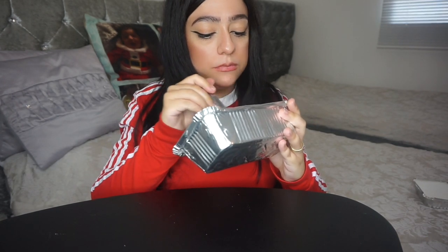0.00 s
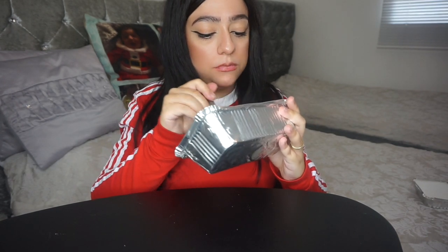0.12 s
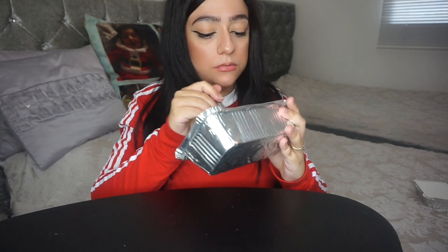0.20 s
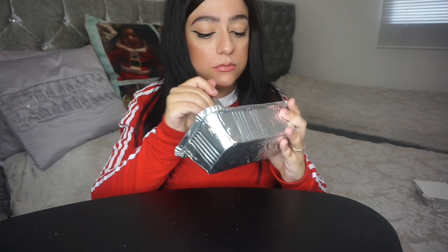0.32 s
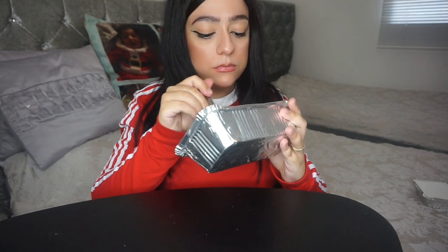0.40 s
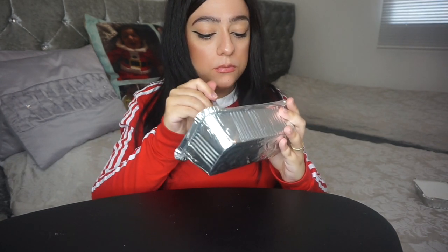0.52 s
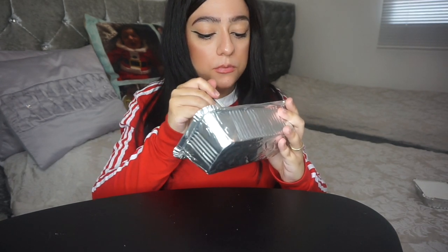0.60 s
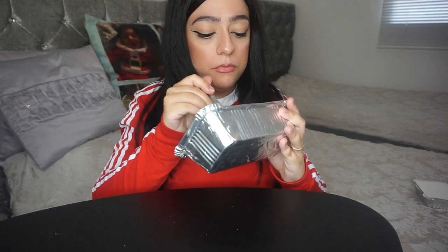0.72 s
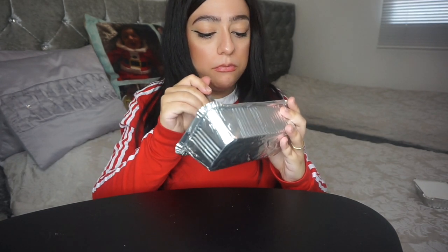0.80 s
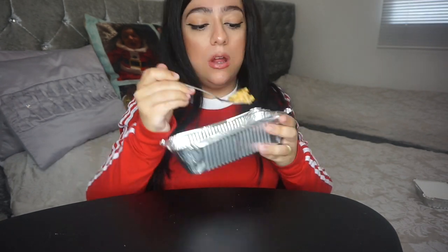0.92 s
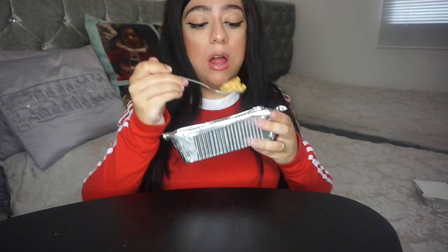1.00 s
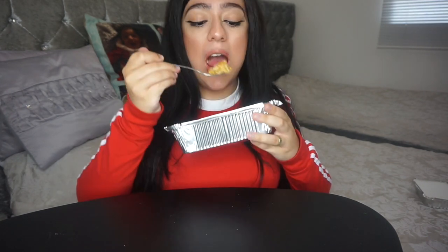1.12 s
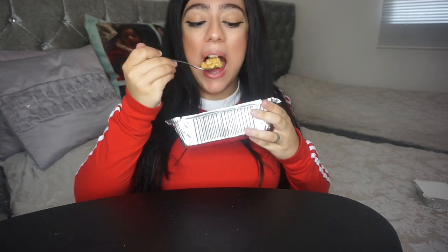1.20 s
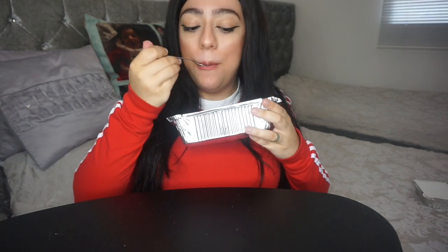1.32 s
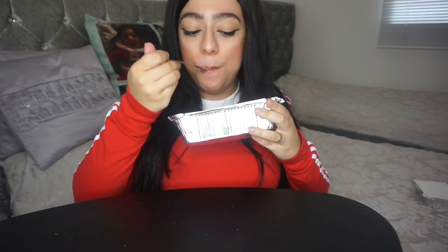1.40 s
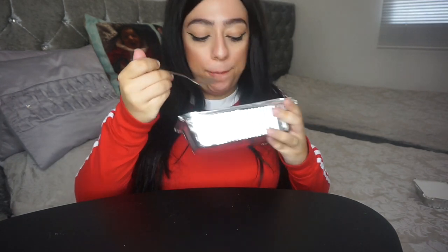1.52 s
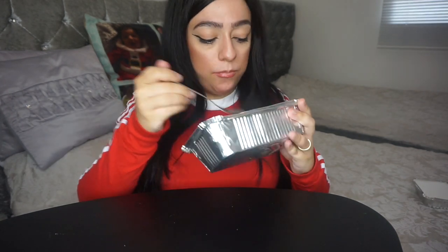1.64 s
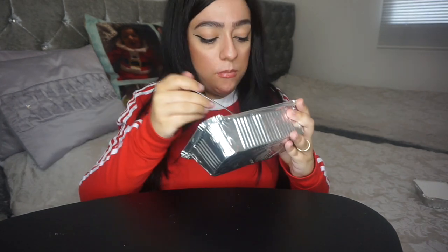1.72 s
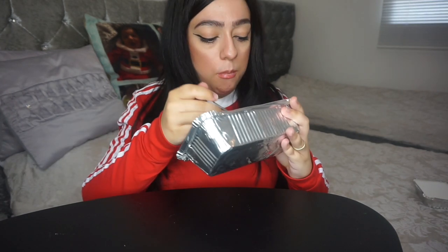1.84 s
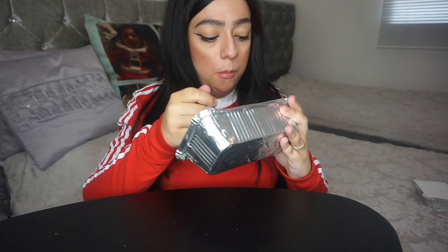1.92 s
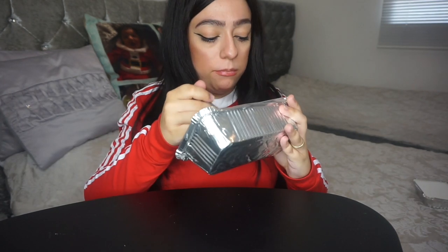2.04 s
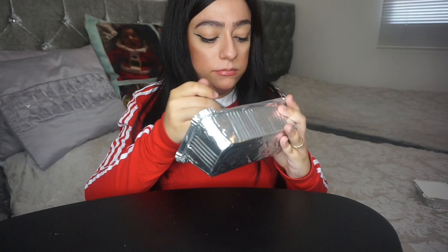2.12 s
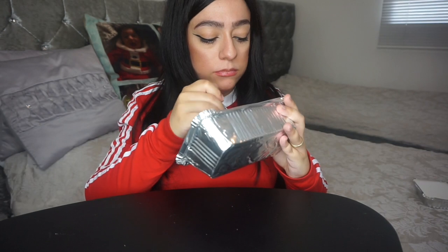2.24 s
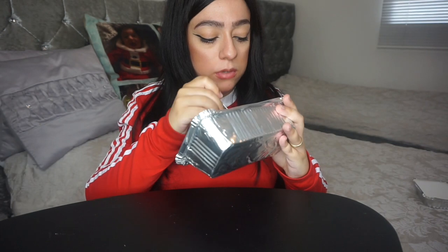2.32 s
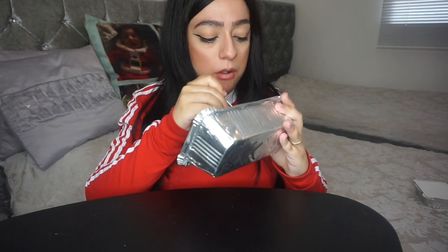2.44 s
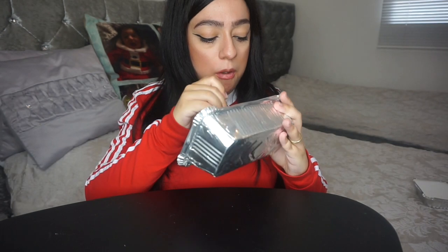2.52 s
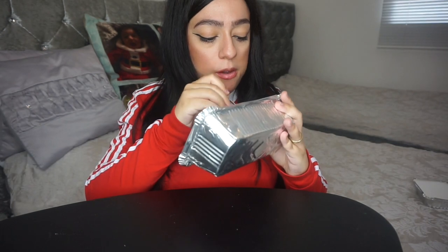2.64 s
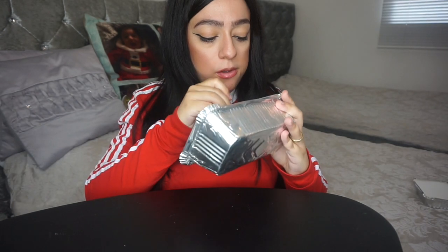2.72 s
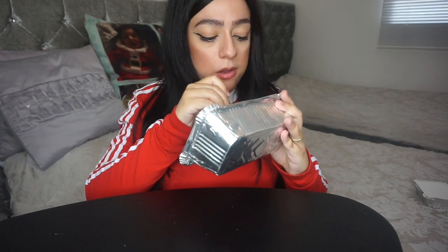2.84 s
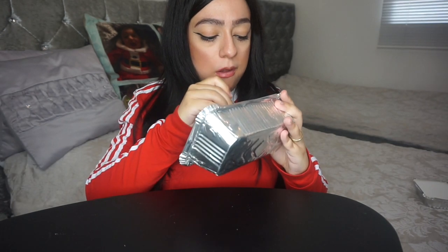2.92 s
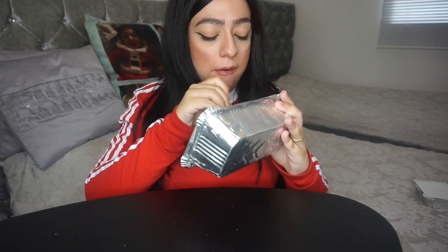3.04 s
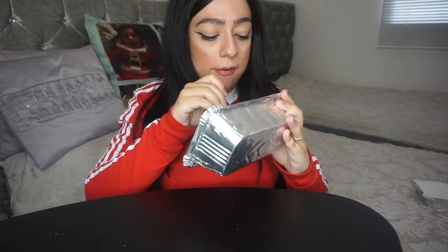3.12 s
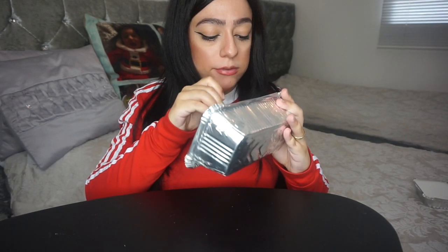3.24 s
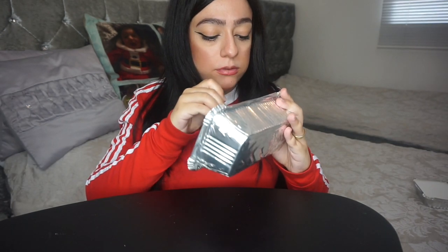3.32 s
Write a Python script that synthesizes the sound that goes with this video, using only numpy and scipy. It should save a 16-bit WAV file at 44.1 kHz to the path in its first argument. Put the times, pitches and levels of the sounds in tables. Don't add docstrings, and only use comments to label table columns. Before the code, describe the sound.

A fork scrapes and clacks inside a hand-held foil tray, a loud rattling burst around half a second, then sparser, softer scrapes with pauses, recorded close in stereo in a quiet furnished bedroom.

```python
import sys
import numpy as np
from scipy import signal
from scipy.fft import rfft, irfft
from scipy.io import wavfile
from scipy.ndimage import uniform_filter1d

SR = 44100
rng = np.random.default_rng(int(sys.argv[2]) if len(sys.argv) > 2 else 0)


def pcm_store(signal):
    levels = np.round(np.clip(np.atleast_2d(signal), -1, 1) * 32767)
    wavfile.write(sys.argv[1], SR, levels.astype(np.int16).T)


def volts_from_decibels(level):
    exponent = np.asarray(level, float) / 20
    return 10 ** exponent


N = 147735
LEAD = 6000
SIZE = N + LEAD

# frequency in Hz, density in dB per Hz.
FLOOR_SPECTRUM = [(25, -18), (120, -11), (350, -6.5), (600, -9), (1900, -15), (4500, -26), (9000, -30),
                  (16000, -28.5)]
# frequency in Hz, likeness from 0 to 1.
FLOOR_LIKENESS = [(50, 1), (250, 0.49), (1000, 0.17), (4000, 0.057), (12000, 0.6)]
FLOOR_DB, WHINE_HZ, WHINE_DB = -53, 15300, -72

# frequency in Hz, time to fall 60 dB in seconds.
ROOM_T60 = [(150, 0.58), (1000, 0.49), (4000, 0.53), (8000, 0.65), (14000, 0.33)]
ROOM_DB, ROOM_DELAY_S, ROOM_LIKENESS = -10, 0.0081, 0.55

# start in seconds, peak in dB, pitch in Hz, 60 dB decay in seconds.
TICKS = [(0.051, -33.5, 10200, 0.0063), (0.26, -15.5, 11200, 0.0078), (0.538, -14, 11600, 0.008),
         (1.182, -36, 11250, 0.019), (1.005, -48, 11900, .01), (1.308, -46, 13800, .012),
         (1.5075, -36.5, 11630, 0.0089), (1.5074, -33, 14900, 0.012), (1.5077, -44, 7650, 0.009),
         (2.03, -31, 11000, .02), (1.9966, -31, 10400, 0.026), (2.009, -26, 12800, 0.022),
         (2.4425, -44.5, 10200, 0.023), (2.654, -42, 9970, 0.018), (2.9195, -41.5, 11200, 0.02),
         (3.161, -41, 11100, 0.02), (3.241, -44, 9270, 0.015), (3.255, -44.5, 9800, 0.041),
         (3.2826, -41, 12800, 0.016), (3.2925, -35, 11300, 0.012), (3.323, -41.5, 10000, 0.027)]
TICK_WIDTH_HZ = 1900

# start in seconds, frequency in Hz, level in dB, 60 dB decay in seconds.
PANEL_RINGS = [(.1962, 386, -22, .05), (.341, 1404, -37, .45), (1.101, 1512, -33, .16),
               (1.984, 224, -34, .5), (2.585, 1150, -41, .35), (3.046, 1185, -35, .3),
               (3.225, 700, -50.5, .6), (.592, 226, -31.5, .33), (.3195, 3390, -23, .024),
               (3.037, 3690, -27, .06), (.64, 522, -27, .3), (.545, 1400, -27, .12)]
PANEL_HELD_S, PANEL_GRIP_DB_PER_S = 0.085, 500

# start in seconds, peak in dB, struck region in Hz, treble in dB.
RIB_KNOCKS = [(0.1965, -12.5, 1804, -23), (0.2618, -13.5, 3570, 14), (0.2614, -15.5, 2260, -10),
              (0.3183, -8, 1940, -10), (0.3196, -9, 2980, -25), (0.3275, -28, 3150, -25),
              (0.539, -13.5, 3610, -10), (0.6112, -9.5, 3130, -12), (0.6223, -6, 3110, -19),
              (0.6376, -4, 3160, -25), (0.649, -2, 2590, -23), (0.6776, -15.5, 3080, -22),
              (0.8317, -29, 1830, -22), (1.0043, -39, 2050, -22), (1.005, -50, 3280, -3),
              (1.0545, -24, 2860, -13), (1.08, -15.5, 2670, -10), (1.574, -42.5, 1850, -22),
              (1.578, -44, 3900, -21), (1.9807, -20, 1860, -10), (2.0307, -23, 3720, -5),
              (2.2532, -23, 2730, -12), (2.2885, -17.5, 2315, -21), (2.2882, -20, 3450, -24),
              (2.311, -16, 3240, -17), (2.3214, -18.5, 2370, 8), (2.3205, -16, 3350, -6),
              (2.334, -21, 2410, -10), (2.5301, -11, 3150, -30), (2.541, -20, 3180, -20),
              (2.5691, -13.5, 3270, -26), (2.7636, -38, 3260, -17), (2.796, -27, 2900, -15),
              (2.8139, -20, 2400, 3), (2.812, -18, 3980, -15), (2.8238, -17.5, 2600, -9),
              (2.847, -22, 2670, -15), (2.854, -28, 2650, -8), (3.0351, -17.5, 3720, -20)]
PING_DB, PING_T60_S, PING_RISE_S = -5, 0.022, 0.0008
PING_DETUNE = 0.07
RIB_BODY_DB = -4

# start in seconds, length in seconds, level in dB, swell over the stroke in dB.
STROKES = [(-.09, 0.071, -34.5, 1), (0.194, 0.05, -35, -7), (0.243, 0.048, -39.5, 5.5),
           (0.316, 0.047, -30, -17.5), (0.537, 0.11, -23, 4), (0.627, 0.047, -27.5, 13),
           (0.668, 0.038, -34, 3.5), (1.043, 0.029, -29, 8.5), (1.077, 0.052, -33.5, -5.5),
           (1.978, 0.076, -34, -0.5), (2.25, 0.045, -38, 1.5), (2.306, 0.058, -36, -2.5),
           (2.536, 0.063, -32.5, -3), (2.799, 0.05, -39.5, -9.5), (2.822, 0.04, -32.5, -2.5),
           (3.031, 0.032, -28.5, -3.5), (3.07, 0.03, -33, -6.5), (3.344, 0.044, -39.5, 15.5)]
# base in dB, belly in dB, wall in dB, lip in dB, treble in dB.
STROKE_COLOUR = [(-1, -1, 1.5, 8.5, 6), (-2.5, -1, -1, -0.5, -3), (-7, -11, 4, 13.5, 10),
                 (1, 1.5, -2.5, -15, -11), (-6.5, -4.5, -3, -1, -1), (-4.5, -4.5, -3.5, -3.5, -11.5),
                 (-1, -5.5, -4, -1.5, -1.5), (-16, 6, -3, 1, -3), (-8, 3.5, -1.5, 8, 2),
                 (-5, 0, -3.5, 0.5, -2), (-3, 1.5, 2.5, -5, -3), (-3.5, 0, -2, 4, -2.5),
                 (2, 4, 1.5, 4.5, -1), (2, 7, 0.5, 1, -1.5), (-6.5, -2.5, 0.5, -1.5, -5),
                 (-23, -0.5, -3, -1, -1.5), (-3.5, -1.5, -1, 3, -3.5), (22, 3, 22, 15, 16.5)]
ATTACK_S, RELEASE_DB_PER_S = 0.0052, 460
SLIPS_PER_S, SLIP_SPREAD_DB = 3000, 2.5

# start in seconds, peak in dB, struck region in Hz, treble in dB.
KNOCKS = [(0.196, -12.5, 420, -38), (0.327, -12.5, 1120, -30), (0.538, -8.5, 1380, 6),
          (0.8935, -35, 1225, -23), (1.0045, -29, 610, -13), (1.062, -27, 610, -20), (1.081, -21, 800, -23),
          (1.98, -18.5, 810, -31), (2.255, -20.5, 960, -5), (2.319, -16.5, 606, -3), (2.334, -17, 1100, 1),
          (2.543, -20, 740, -21), (2.574, -16, 670, -15), (2.587, -31, 700, -8), (2.797, -23, 515, 3),
          (2.8123, -20.5, 570, 0.5), (2.8244, -13, 1025, 1), (3.032, -12, 533, -22), (3.04, -5, 1130, -21),
          (3.343, -26, 840, -11), (0.654, -9, 860, -20), (0.682, -14, 955, -20)]
KNOCK_DB, KNOCK_TREBLE_DB, CONTACT_S = -23.5, 2, 0.0012
FOCUS_DB, FOCUS_OCTAVES = 14, 0.2

# frequency in Hz, level in dB, 60 dB decay in seconds.
TRAY_MODES = [(223, -4, 0.062), (318.7, 0, 0.067), (393.6, -2, 0.094), (524, -1.5, 0.05), (774, -9, 0.033),
              (872, -6, 0.089), (1054, -3.5, 0.13), (1134, -1, 0.09), (1865, -5, 0.08), (2370, -1, 0.03),
              (2530, -13, .032), (2920, -32, .035), (3312, -34, 0.033), (4470, -32, 0.025)]
TRAY_DB = -5
# frequency in Hz, density in dB per Hz.
FOIL_SPECTRUM = [(150, -30), (230, -11), (1100, -3), (1600, -10.5), (3400, -11.5), (4300, -20), (7500, -28),
                 (13500, -23), (16000, -30)]
# frequency in Hz, 60 dB decay in seconds.
FOIL_T60 = [(200, 0.062), (1000, 0.036), (3000, 0.013), (5000, 0.0044), (7000, 0.0018)]
FOIL_MODES = 110

BASE_BELOW_HZ, BELLY_BELOW_HZ, WALL_FROM_HZ, LIP_FROM_HZ, TREBLE_FROM_HZ = 430, 950, 1650, 3800, 6000
MODE_SCATTER_DB, MODE_PAN_DB = 2.5, 3.5
PAN_DB = -2
FULL_PAN_HZ, RIM_FROM_HZ, TRAY_CUT_HZ = 2500, 3400, 140
TOP, CUTOFF_HZ = 0.7, 16600


def at_hz(points, hz):
    points = np.array(points)
    return np.interp(np.log(hz), np.log(points[:, 0]), points[:, 1])


def two_mics(mid, side, alike):
    return np.sqrt(1 + alike) * mid + np.sqrt(1 - alike) * side * [[1], [-1]]


def floor():
    hz = np.maximum(np.arange(N // 2 + 1) * SR / N, 1)
    mid, side = rfft(rng.standard_normal((2, N))) * volts_from_decibels(at_hz(FLOOR_SPECTRUM, hz))
    hiss = irfft(two_mics(mid, side, np.clip(at_hz(FLOOR_LIKENESS, hz), -1, 1)), N)
    whine = volts_from_decibels(WHINE_DB) * np.sin(2 * np.pi * WHINE_HZ * np.arange(N) / SR)
    return volts_from_decibels(FLOOR_DB) * hiss / hiss.std() + whine


def room(near):
    t = np.arange(SR // 2 + SR // 4) / SR
    white = rng.standard_normal((2, 2, len(t)))
    tails = 0
    for k, hz in enumerate(125 * 2. ** np.arange(8)):
        edges = [hz / np.sqrt(2), min(hz * np.sqrt(2), 19000)]
        octave = signal.butter(2, edges, "band", fs=SR, output="sos")
        tails = tails + signal.sosfilt(octave, white[k % 2]) * volts_from_decibels(-60 * t / at_hz(ROOM_T60, hz))
    build_up = np.clip(t / ROOM_DELAY_S - 1, 0, 1)
    tails = tails * build_up / np.sqrt(SR * 0.032)
    mid, side = signal.fftconvolve(tails, near.mean(axis=0)[None], axes=1)[:, :near.shape[1]]
    return two_mics(mid, side, ROOM_LIKENESS) / np.sqrt(2)


def ticks():
    t = np.arange(2000) / SR
    out = np.zeros((2, SIZE + len(t)))
    grains = rng.standard_normal((len(TICKS), 3, len(t)))
    for (start, db, hz, t60), grain in zip(TICKS, grains):
        shared_and_own = grain[0] + 0.57 * grain[1:]
        burst = shared_and_own * volts_from_decibels(-60 * t / t60) * np.minimum(t / 0.001, 1)
        edges = np.clip([hz - TICK_WIDTH_HZ, hz + TICK_WIDTH_HZ], 1000, 17000)
        burst = signal.sosfilt(signal.butter(3, edges, "band", fs=SR, output="sos"), burst)
        i = int(start * SR) + LEAD
        out[:, i:i + len(t)] += volts_from_decibels(db) * burst / np.abs(burst).max()
    return out[:, :SIZE]


def panels():
    out = np.zeros(SIZE)
    for start, hz, db, t60 in PANEL_RINGS:
        t = np.maximum((np.arange(SIZE) - LEAD) / SR - start, 0)
        flutter = uniform_filter1d(rng.standard_normal(SIZE), size=600)
        flutter_db = 3.53 * flutter / flutter.std()
        grip_db = PANEL_GRIP_DB_PER_S * np.maximum(t - PANEL_HELD_S, 0) * (hz < BASE_BELOW_HZ)
        swell = np.minimum(t * hz / 3, 1)
        out += volts_from_decibels(db - 60 * t / t60 - grip_db + flutter_db) * swell * np.sin(2 * np.pi * hz * t)
    return out * volts_from_decibels([[PAN_DB / 2], [-PAN_DB / 2]])


def rib_pings():
    t = np.arange(2000) / SR
    out = np.zeros((2, SIZE + len(t)))
    luck = rng.uniform(-1.2, 1, (len(RIB_KNOCKS), 3))
    fade = volts_from_decibels(-60 * t / PING_T60_S) * np.minimum(t / PING_RISE_S, 1)
    for (start, db, hz, _), (below, above, pan) in zip(RIB_KNOCKS, luck):
        tones_hz = hz * (1 + PING_DETUNE * np.array([[0], [-1 + 0.29 * below], [1 + 0.44 * above]]))
        tones = np.sin(2 * np.pi * tones_hz * t) * [[0.7], [0.35], [0.35]]
        ping = volts_from_decibels(db + PING_DB) * fade * tones.sum(axis=0)
        i = int(start * SR) + LEAD
        out[0, i:i + len(t)] += ping * volts_from_decibels(PAN_DB / 2 + pan)
        out[1, i + 1:i + len(t)] += ping[:-1] * volts_from_decibels(-PAN_DB / 2 - pan)
    return out[:, :SIZE]


def stroke_shapes():
    t = (np.arange(SIZE) - LEAD) / SR
    start, length, db, swell_db = np.transpose(STROKES)[:, :, None]
    since = t - start
    swell = swell_db * (np.clip(since / length, 0, 1) - 0.5)
    release = RELEASE_DB_PER_S * np.clip(since - length, 0, 0.3)
    attack = np.clip(since / ATTACK_S, 0, 1)
    return volts_from_decibels(db + swell - release) * attack * (since < length + 0.15)


def slip_clicks():
    happens = rng.random((4, SIZE)) < SLIPS_PER_S / SR
    sign = rng.choice([-1, 1], (4, SIZE))
    strength = volts_from_decibels(SLIP_SPREAD_DB * np.minimum(rng.exponential(1, (4, SIZE)), 4))
    slips = happens * sign * strength
    return slips / slips.std()


def tray_modes():
    small_hz = np.geomspace(150, 15800, num=FOIL_MODES) * rng.uniform(0.97, 1.01, FOIL_MODES)
    small_t60 = at_hz(FOIL_T60, small_hz)
    small_db = at_hz(FOIL_SPECTRUM, small_hz) + 10 * np.log10(small_hz / 1000 * 0.042 / small_t60)
    strong = [(hz, db + TRAY_DB, t60) for hz, db, t60 in TRAY_MODES]
    return strong + list(zip(small_hz, small_db, small_t60))


def mode_pressure(hz, db, high):
    parts = [hz < BASE_BELOW_HZ,
             (hz >= BASE_BELOW_HZ) & (hz < BELLY_BELOW_HZ),
             (hz > WALL_FROM_HZ) & (hz <= LIP_FROM_HZ),
             (hz > LIP_FROM_HZ) & ~high,
             high]
    luck = rng.standard_normal((len(STROKES), len(hz)))
    scatter_db = MODE_SCATTER_DB * luck * np.where(high, 0.3, 1)
    drive = volts_from_decibels(scatter_db + np.array(STROKE_COLOUR) @ parts)
    return (drive.T @ stroke_shapes()) * volts_from_decibels(db - 30.5)[:, None]


def ring(clicks, hz, t60):
    r = volts_from_decibels(-60 / (t60 * SR))
    w = 2 * np.pi * hz / SR
    return signal.lfilter([0, np.sin(w)], [1, -2 * r * np.cos(w), r * r], clicks + 1e-18)


def tray():
    slips = slip_clicks()
    modes = tray_modes()
    hz_all, db_all, _ = np.array(modes).T
    high = hz_all > TREBLE_FROM_HZ
    pressure = mode_pressure(hz_all, db_all, high)

    start, knock_db, region_hz, treble_db = np.transpose(KNOCKS + RIB_KNOCKS)
    knock_db = knock_db + RIB_BODY_DB * (np.arange(len(start)) >= len(KNOCKS))
    knock_luck_db = rng.standard_normal((len(start), len(modes)))
    contact = CONTACT_S * rng.random((len(start), len(modes)))
    sides = rng.standard_normal((len(modes), 2))
    sides = sides * np.minimum(hz_all / FULL_PAN_HZ, 1)[:, None]

    out = np.zeros((2, SIZE + 9))
    for k, (hz, level_db, t60) in enumerate(modes):
        grit = np.roll(slips[k % 4], 997 * k * high[k])
        drive = (-1) ** (k // 4) * pressure[k] * grit
        focus_db = FOCUS_DB * np.exp(-0.5 * (np.log2(hz / region_hz) / FOCUS_OCTAVES) ** 2)
        bright_db = high[k] * (treble_db + KNOCK_TREBLE_DB)
        hit_db = knock_db + KNOCK_DB + level_db + focus_db + bright_db + knock_luck_db[:, k]
        hit_at = ((start + contact[:, k]) * SR).astype(int) + LEAD
        drive[hit_at] += (-1) ** k * volts_from_decibels(hit_db)
        sound = ring(drive, hz, t60)

        lag = int(k % 4 == 0) if high[k] else 1 + (hz > RIM_FROM_HZ) * (k % 5)
        pan_db = PAN_DB / 2 * ~high[k]
        out[0, :SIZE] += sound * volts_from_decibels(MODE_PAN_DB * sides[k, 0] + pan_db)
        out[1, lag:SIZE + lag] += sound * volts_from_decibels(MODE_PAN_DB * sides[k, 1] - pan_db)
    low_cut = signal.butter(6, TRAY_CUT_HZ, "high", fs=SR, output="sos")
    return signal.sosfilt(low_cut, out[:, :SIZE])


def scene():
    near = tray() + ticks() + panels() + rib_pings()
    return (near + volts_from_decibels(ROOM_DB) * room(near))[:, LEAD:] + floor()


def band_limit(x):
    return signal.sosfilt(signal.butter(12, 16800, fs=SR, output="sos"), x)


def record(dry):
    rounded = TOP * np.tanh(dry / TOP)
    top_cut = signal.cheby2(12, 60, CUTOFF_HZ, fs=SR, output="sos")
    return band_limit(signal.sosfilt(top_cut, rounded))


dry = scene()
out = record(dry)
pcm_store(out)
```